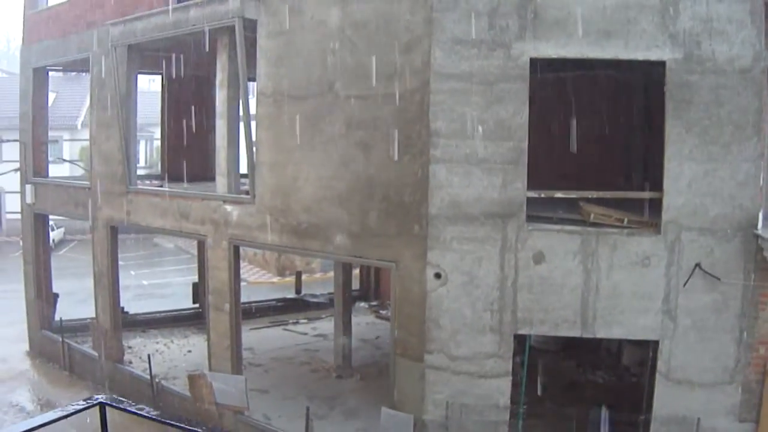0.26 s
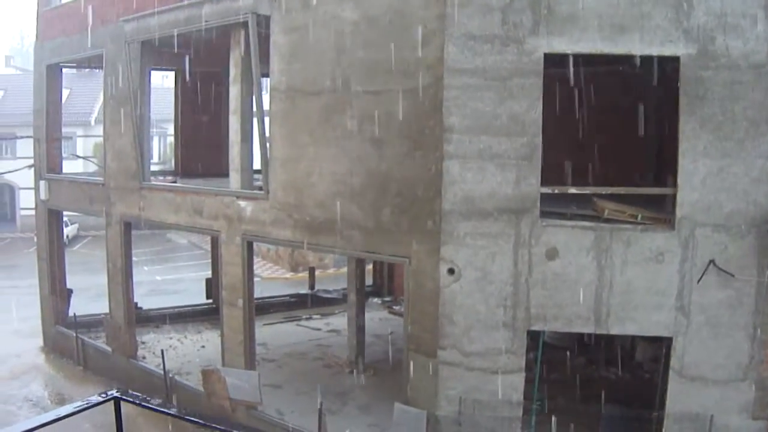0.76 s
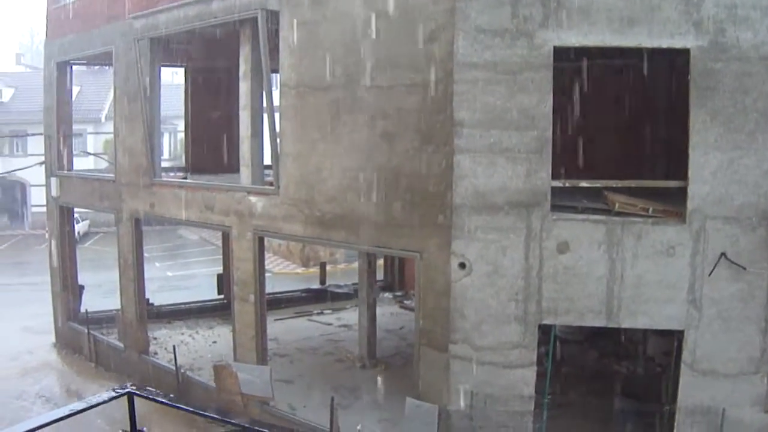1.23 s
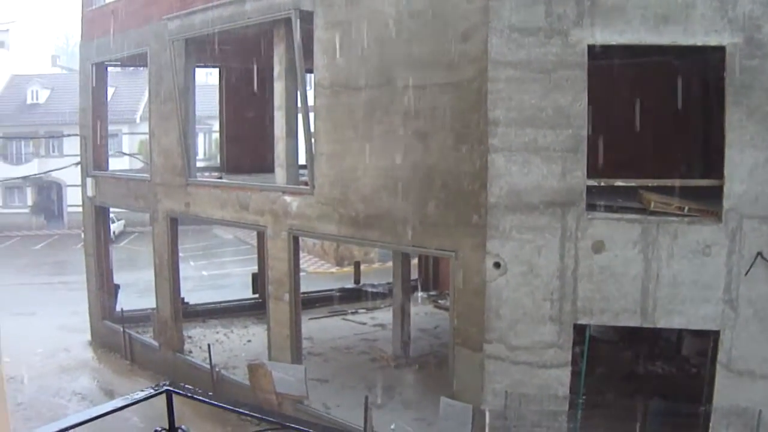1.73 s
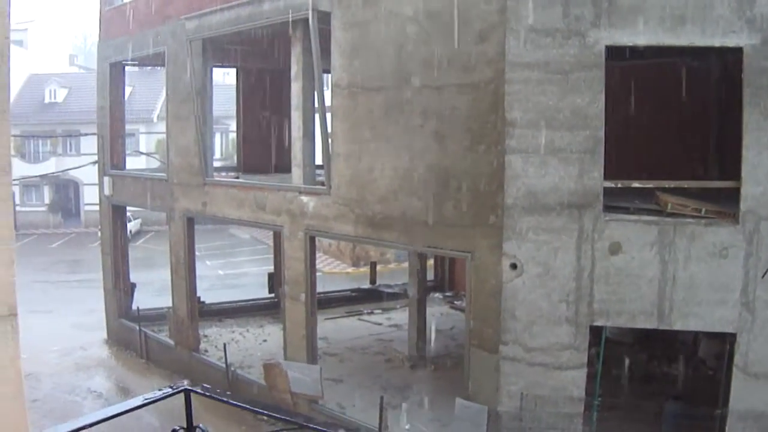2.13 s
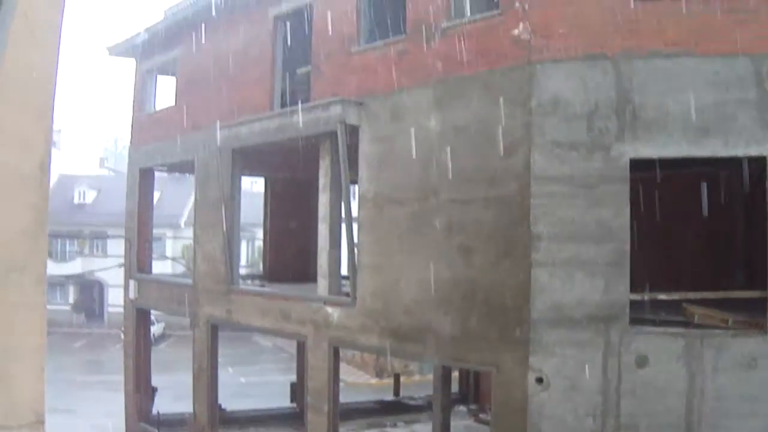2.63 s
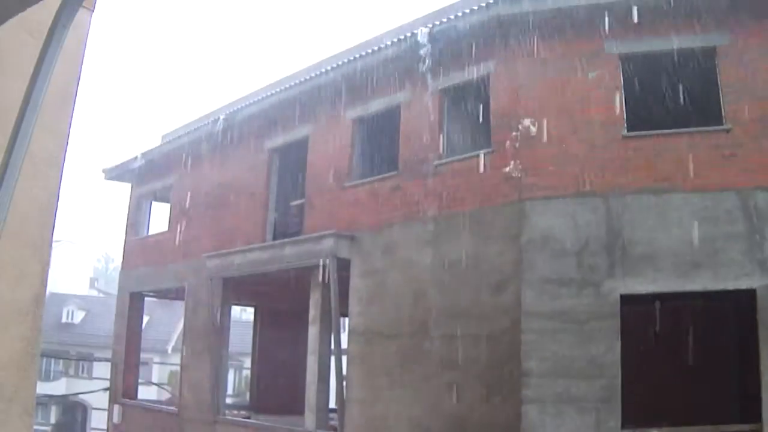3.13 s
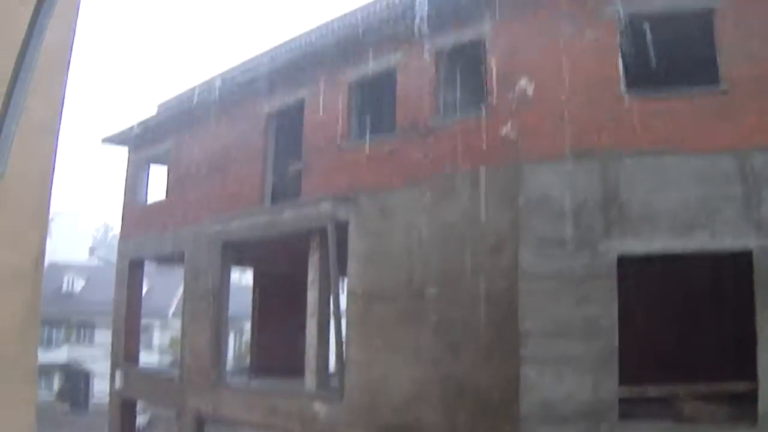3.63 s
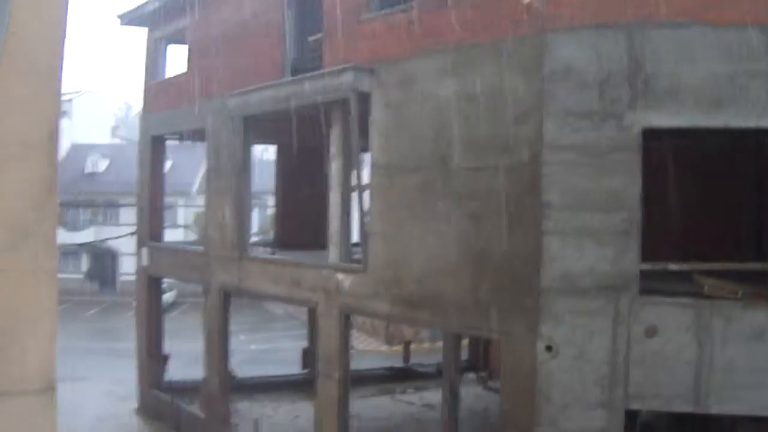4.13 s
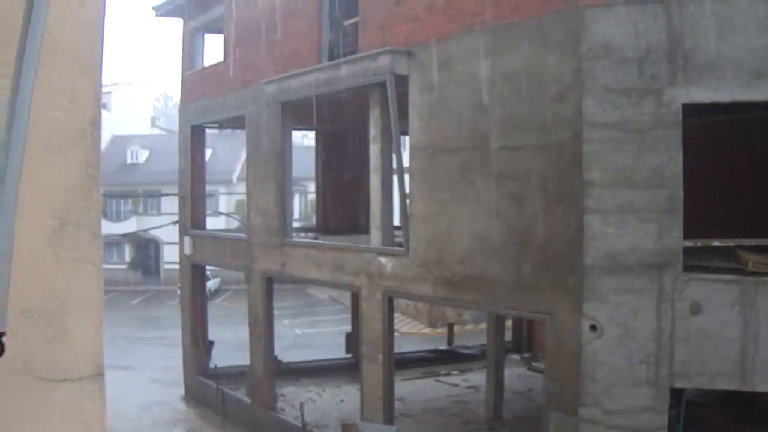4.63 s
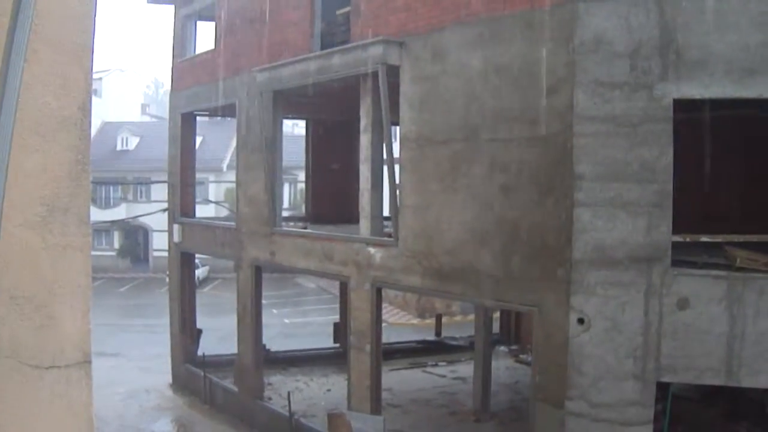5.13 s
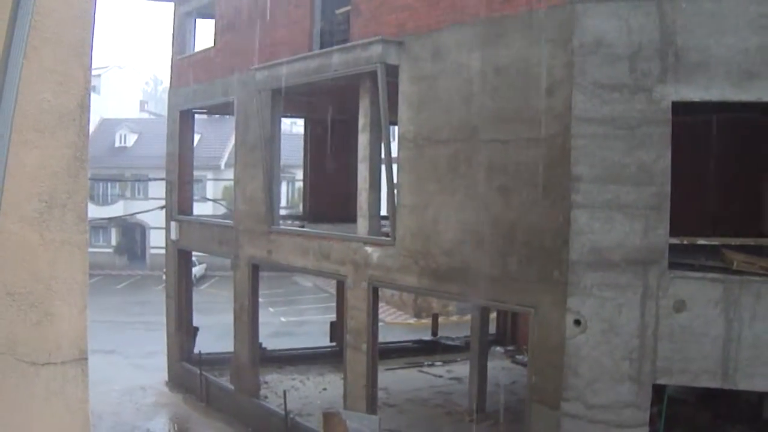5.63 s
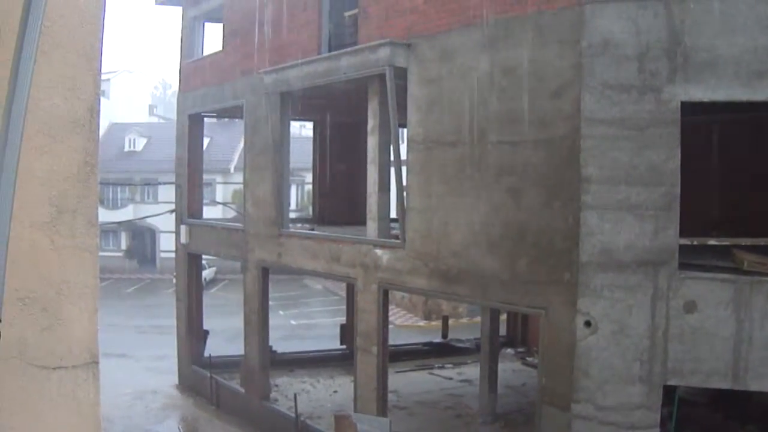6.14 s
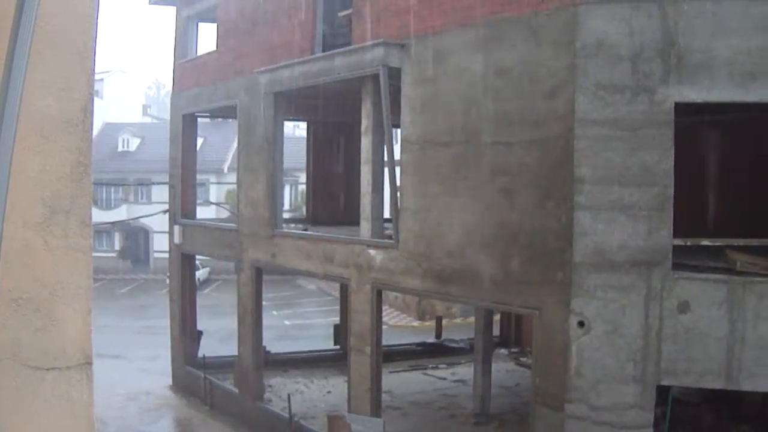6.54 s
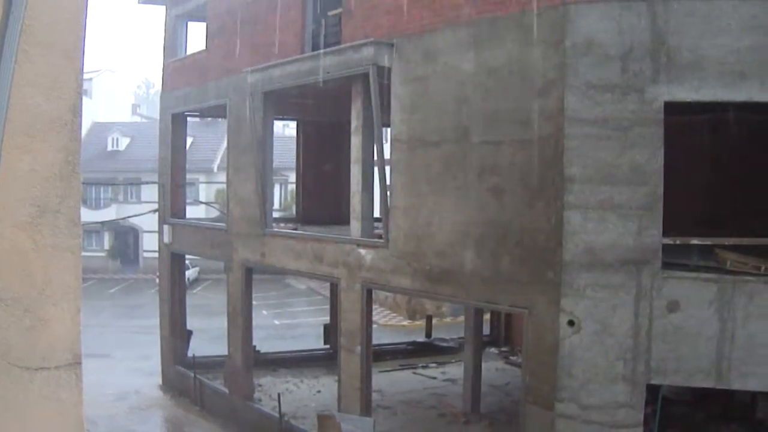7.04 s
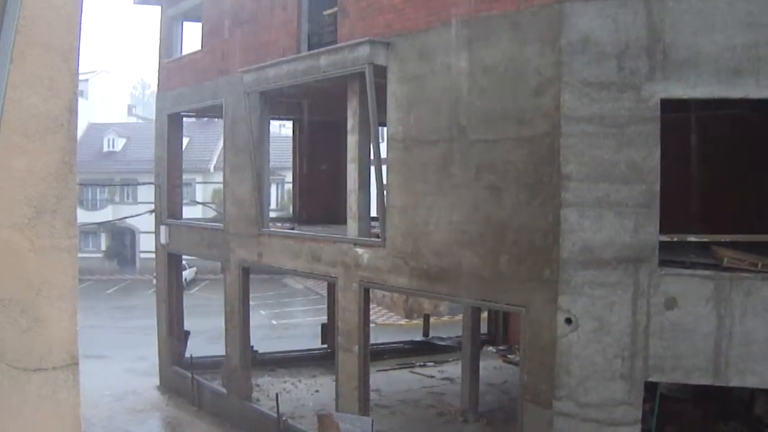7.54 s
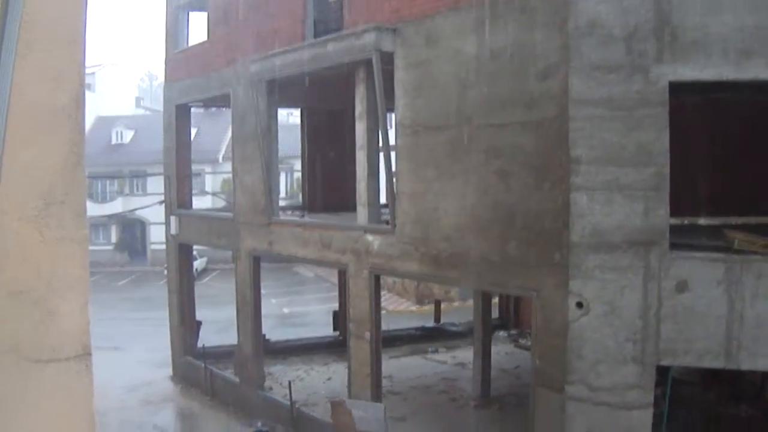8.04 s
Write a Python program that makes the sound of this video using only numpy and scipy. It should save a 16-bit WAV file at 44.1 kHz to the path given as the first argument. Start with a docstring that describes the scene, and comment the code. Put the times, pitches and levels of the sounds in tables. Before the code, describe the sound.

A steady downpour hisses and patters on wet pavement, while close drops crack on a sill and a hand briefly rubs the microphone.

```python
"""Paved lot and concrete building shell in heavy rain, heard from an open window.
Far drops merge into a wash; nearer ones patter, splash and trap ringing bubbles in puddles.
Run-off gushes into the puddles. A few drops burst on the sill; the loudest duck the limiter.
The hand-held microphone tilts once, shading the near rain, with a rub, soft bumps and rumble."""
import sys
import numpy as np
from scipy import signal
from scipy.fft import rfft, irfft
from scipy.io import wavfile
from scipy.ndimage import uniform_filter1d

SR = 44100
rng = np.random.default_rng(int(sys.argv[2]) if len(sys.argv) > 2 else 0)


def materialize(psi):
    """Save the field psi as 16-bit PCM at rate SR to the path in sys.argv[1].

    A 1-D psi becomes a single channel; in a 2-D psi each row is a channel.
    """
    bounded = np.clip(np.atleast_2d(psi).T, -1, 1)
    quanta = np.round(bounded * 32767).astype(np.int16)
    wavfile.write(sys.argv[1], SR, quanta)


N = 365148
TIME_S = np.arange(N) / SR
BIN_HZ = np.maximum(np.arange(N // 2 + 1) * SR / N, 1)

# downpour strength: t/s, level/dB
RAIN_LEVEL = [(0, -24), (.3, -25), (.55, -23.5), (1.7, -24), (2.0, -23.5), (2.8, -24), (3.7, -23),
              (5.6, -23), (6.4, -23.5), (8.28, -23.5)]
# far rain: f/Hz, relative level/dB
WASH_SPECTRUM = [(25, -73), (60, -39), (120, -20), (210, -9.5), (320, -6.5), (430, -8.2), (620, -3.5),
                 (800, -1), (1150, -1.5), (2000, -6), (4200, -9), (6500, -13), (7800, -14.5),
                 (11000, -16.5)]
# hollow ring of yard and open concrete rooms: f/Hz, width/Hz, gain/dB
YARD_RESONANCES = [(218, 22, 3), (322, 50, -4), (380, 23, 0.5), (428, 20, -2), (478, 46, 2.6),
                   (524, 35, -3), (594, 45, 2.5), (667, 24, -4), (736, 62, 3), (893, 29, 5), (918, 78, -3),
                   (1173, 56, 2), (1360, 43, -1), (1710, 400, 2), (2000, 120, 0), (2300, 140, 1.5),
                   (4600, 300, 1), (6580, 360, 2.5)]
# near rain: f/Hz, relative level/dB
PATTER_SPECTRUM = [(200, -29), (700, -6), (1500, -2), (3200, 1), (6000, -3), (8000, -7.5), (11000, -7)]
# air on the microphone: t/s, level/dB
AIR_LEVEL = [(0, -66), (.8, -59), (4.6, -63), (5.2, -66), (8.28, -68)]
# grip shifts on the case: centre t/s, level/dB, half-length/s
GRIP_SWELLS = [(.65, -55, .12), (0.89, -46, 0.077), (2.1, -41, 0.052), (2.3, -45, 0.14), (2.7, -46, .08),
               (3.04, -49, .05), (3.2, -49, .05), (3.468, -51, .06), (3.82, -60, .09), (4.73, -53, .04)]
# air and grip rumble: f/Hz, relative level/dB
RUMBLE_SPECTRUM = [(20, -27), (50, -6), (85, 0), (140, 4), (300, -27)]
# bursts on the sill: t/s, crack level/dB, spray level/dB, f/Hz, spray width/f, spray decay/s
SILL_DROPS = [(.467, -15, -23, 4500, .9, .024), (.526, -12, -24, 8900, .54, .018),
              (.773, -9, -16, 6000, .35, .004), (1.372, -18, -12, 1600, .55, .004),
              (1.381, -16, -18.5, 3100, .45, .014), (1.4262, -6, -25, 8000, .6, .0025),
              (1.453, -2.5, -18, 6300, .28, .007), (2.6325, -1.5, -12.3, 6000, .5, .007),
              (3.0548, -.5, -8.5, 3900, .45, .0024), (3.2812, 1, -16.3, 7400, .55, .0045),
              (3.656, -13, -23, 7800, .5, .005), (4.199, -18, -20, 5000, .5, .008),
              (4.224, -16, -20, 6800, .25, .005), (4.292, -12, -20.5, 5300, .8, .0055),
              (4.9635, -14, -18, 3400, .74, .007), (5.041, -12, -24, 8200, .5, .005),
              (5.449, -16, -21, 4500, .4, .005), (6.05, -9, -21.5, 8800, .55, .0069),
              (7.091, -6, -19, 7600, .6, .004), (7.179, -14, -17.5, 5400, 1.1, .012),
              (7.5719, -5, -14, 5500, .13, .003), (8.075, -18, -20, 2000, .5, .011),
              (8.088, -10, -25, 10300, .15, .005), (8.1175, -8, -14, 4900, 0.49, .004),
              (8.1695, -0.5, -12.5, 5000, .6, .0026)]
# run-off into puddles: centre t/s, level/dB, half-length/s, f/Hz, width/Hz
RUNOFF_GUSHES = [(.475, -28, 0.024, 997, 400), (1.174, -30, 0.065, 1102, 600),
                 (3.03, -28.5, 0.039, 1226, 200), (4.135, -27, 0.027, 843, 300),
                 (4.297, -28, 0.027, 980, 330), (6.666, -28, 0.056, 818, 298),
                 (6.965, -25.5, 0.028, 958, 350), (7.038, -29, 0.045, 1604, 250)]
# close drips trapping a bubble: t/s, level/dB, f/Hz, decay/s
DRIP_PLINKS = [(.6474, -16, 2500, .004), (4.1245, -12, 2600, .0042), (4.126, -20, 4440, .004),
               (4.242, -16, 3870, .005), (6.1754, -20, 6450, .007)]
# rub, loose to gripping to released: centre t/s, level/dB, half-length/s, width/Hz
RUB_SWELLS = [(1.85, -30, .25, 300), (2.26, -29.5, 0.12, 300), (2.315, -24, 0.033, 170),
              (2.405, -24, 0.091, 160), (2.535, -31.5, 0.054, 240)]
# hand on the case: t/s, level/dB, f/Hz
CASE_BUMPS = [(2.08, -20, 120), (2.131, -21, 260), (2.151, -22, 175), (2.164, -22, 180),
              (2.226, -23.5, 200), (2.530, -23, 230), (2.587, -20, 170), (2.594, -24, 149),
              (2.666, -22, 250), (2.729, -15, 275), (2.735, -19, 244), (2.754, -17, 230), (3.155, -27, 150)]
# skin on the case: f/Hz, relative level/dB
RUSTLE_SPECTRUM = [(30, -29), (90, -8), (200, -4), (350, -14), (800, -16), (3000, -50)]


def from_db(db):
    """Decibels to gain."""
    return 10 ** (np.asarray(db) / 20)


def unit_rms(x):
    """Scale to rms 1."""
    return x / np.sqrt(np.mean(x ** 2) + 1e-20)


def curve(rows):
    """Breakpoints to one value per sample."""
    return np.interp(TIME_S, *np.transpose(rows))


def swell(centre_s, half_s):
    """Gaussian envelope: peak 1, 1/e at half_s either side."""
    return np.exp(-np.minimum(((TIME_S - centre_s) / half_s) ** 2, 50))


def coloured(x, spectrum, resonances=()):
    """Apply a smooth spectrum plus peaks and dips; rms 1."""
    hz, db = np.transpose(spectrum)
    shape_db = np.interp(np.log(BIN_HZ), np.log(hz), db)
    for centre_hz, width_hz, gain_db in resonances:
        shape_db += gain_db / (1 + (2 * (BIN_HZ - centre_hz) / width_hz) ** 2)
    return unit_rms(irfft(rfft(x) * from_db(shape_db), N))


def drift(corner_hz):
    """Low-passed noise; rms 1."""
    return unit_rms(irfft(rfft(rng.standard_normal(N)) / (1 + (BIN_HZ / corner_hz) ** 2), N))


def noise_band(hz, width_hz):
    """Noise around a steady or moving pitch; rms 1."""
    phase = 2 * np.pi * np.cumsum(hz * np.ones(N)) / SR
    return unit_rms(drift(width_hz) * np.cos(phase) + drift(width_hz) * np.sin(phase))


def resonate(x, hz, width_hz):
    """Two-pole resonator, peak gain 1."""
    radius = np.exp(-np.pi * width_hz / SR)
    feedforward = np.array([1, 0, -1]) * (1 - radius ** 2) / 2
    feedback = [1, -2 * radius * np.cos(2 * np.pi * hz / SR), radius ** 2]
    return signal.lfilter(feedforward, feedback, x + 1e-18)


def low_cut(x, hz, order=3):
    """Maximally flat high-pass."""
    return signal.sosfilt(signal.butter(order, hz, "high", fs=SR, output="sos"), x)


def impacts(per_s, spread_db):
    """Random drop impulses: many small, few large."""
    sizes = from_db(spread_db * np.minimum(rng.exponential(1, N), 4))
    return sizes * (rng.random(N) < per_s / SR)


def wash(flutter_db):
    """Countless far drops merge into a roar, coloured by the yard."""
    roar = coloured(rng.standard_normal(N), WASH_SPECTRUM, YARD_RESONANCES)
    return roar * from_db(flutter_db * drift(corner_hz=6.6))


def plops(per_s, spread_db, decay_cycles, chirp, size=2048):
    """Drops trap bubbles in puddles; each rings a few cycles, pitch rising slightly."""
    out, age_s = np.zeros(N + size), np.arange(size) / SR
    sizes = impacts(per_s, spread_db)
    pitches_hz = 650 * 2 ** (2.3 * rng.random(N) ** 1.498)
    for at in np.flatnonzero(sizes):
        cycles = pitches_hz[at] * age_s
        ring = np.sin(2 * np.pi * cycles * (1 + chirp * cycles / decay_cycles))
        out[at:at + size] += sizes[at] * ring * np.exp(-cycles / decay_cycles)
    return unit_rms(low_cut(out[:N], hz=556))  # small bubbles radiate no bass


def patter(per_s, spread_db, width_ratio, bands=12):
    """Near drops tick for a cycle or two, pitched by their size and the puddle hit."""
    ticks = impacts(per_s, spread_db) * rng.choice([-1, 1], N)
    tick_band = rng.integers(0, bands, N)
    out = np.zeros(N)
    for band, hz in enumerate(np.geomspace(900, 10500, bands)):
        out += resonate(ticks * (tick_band == band), hz, width_ratio * hz)
    return coloured(out, PATTER_SPECTRUM)


def splashes(per_s, spread_db, decay_s, droplets_per_s, bands=6):
    """Fat drops throw short showers of droplets, each with its own brightness."""
    out = np.zeros(N)
    pole = np.exp(-2 / (decay_s * SR))
    for hz in np.geomspace(2400, 9800, bands):
        hits = impacts(per_s / bands, spread_db)
        energy = signal.lfilter([1], [1, -pole], hits ** 2 + 1e-18)
        droplets = rng.standard_normal(N) * (rng.random(N) < droplets_per_s / SR)
        out += resonate(np.sqrt(energy) * droplets, hz, width_hz=0.29 * hz)
    return coloured(out, PATTER_SPECTRUM)


def rumble():
    """Air brushes the microphone; grip shifts swell over it."""
    air_power = from_db(curve(AIR_LEVEL)) ** 2
    grip_power = sum((from_db(db) * swell(t_s, half_s)) ** 2 for t_s, db, half_s in GRIP_SWELLS)
    return np.sqrt(air_power + grip_power) * coloured(rng.standard_normal(N), RUMBLE_SPECTRUM)


def sill_drops(crack_decay_s=0.000138, spray_delay_s=0.0021, spray_attack_s=0.0005, size=4096):
    """A drop cracks on the sill, then breaks into spray around the same pitch."""
    out, age_s = np.zeros(N + size), np.arange(size) / SR
    spray_age_s = np.maximum(age_s - spray_delay_s, 0)
    for t_s, crack_db, spray_db, hz, width_ratio, decay_s in SILL_DROPS:
        at = int(t_s * SR)
        crack = np.sin(2 * np.pi * hz * age_s) * np.exp(-age_s / crack_decay_s)
        spray = unit_rms(resonate(rng.standard_normal(size), hz, width_ratio * hz))
        envelope = np.exp(-spray_age_s / decay_s) * (1 - np.exp(-spray_age_s / spray_attack_s))
        out[at:at + size] += from_db(crack_db) * crack + from_db(spray_db) * spray * envelope
    return low_cut(out[:N], hz=420, order=2)


def gushes():
    """Run-off hits a puddle: a crowd of like-sized bubbles swells and dies."""
    bubbles = sum(from_db(db) * swell(t_s, half_s) * noise_band(hz, width_hz)
                  for t_s, db, half_s, hz, width_hz in RUNOFF_GUSHES)
    return low_cut(bubbles, hz=490)


def plinks(attack_s=0.0012, rise_per_s=1.5, size=4096):
    """A close drip traps one bubble; its clear pitch climbs slightly as it surfaces."""
    out, age_s = np.zeros(N + size), np.arange(size) / SR
    for t_s, db, hz, decay_s in DRIP_PLINKS:
        at = int(t_s * SR)
        ring = np.sin(2 * np.pi * hz * age_s * (1 + rise_per_s * age_s / 2))
        envelope = np.exp(-age_s / decay_s) * (1 - np.exp(-age_s / attack_s))
        out[at:at + size] += from_db(db) * ring * envelope
    return out[:N]


def rub(top_hz=1835, sag_hz=129.2, slip_hz=110, rough_db=2):
    """Stick-slip feeds one resonance: broad when loose, a rasping half-whistle when gripping."""
    pitch_hz = top_hz - sag_hz * (1 - swell(centre_s=2.39, half_s=0.2))
    slips = unit_rms(from_db(rough_db * drift(slip_hz)))
    resonance = sum(from_db(db) * swell(t_s, half_s) * noise_band(pitch_hz, width_hz)
                    for t_s, db, half_s, width_hz in RUB_SWELLS)
    return slips * resonance


def bumps(attack_cycles, size=4096):
    """A fingertip pushes the case, which swings about twice and passes little deep bass."""
    out, age_s = np.zeros(N + size), np.arange(size) / SR
    for t_s, db, hz in CASE_BUMPS:
        at = int(t_s * SR)
        push = (age_s * hz / attack_cycles) ** 2
        envelope = push * np.exp(1 - push)
        out[at:at + size] += from_db(db) * envelope * np.sin(2 * np.pi * hz * age_s)
    return low_cut(out[:N], hz=116)


def rustle(knocks, smear_s):
    """Skin drags on the case around each bump."""
    envelope = np.sqrt(np.abs(uniform_filter1d(knocks ** 2, int(smear_s * SR))))
    return envelope * coloured(rng.standard_normal(N), RUSTLE_SPECTRUM)


def scene():
    """Rain layers following the downpour, close water and hand noise; mono."""
    rain_db = curve(RAIN_LEVEL)
    tilt_shade_db = 2.5 * swell(centre_s=3.15, half_s=0.83)  # up, away from the wet ground, and back
    near_db = rain_db - tilt_shade_db
    far = from_db(rain_db + 0.5) * wash(flutter_db=0.25)
    puddles = from_db(rain_db - 11) * plops(per_s=260, spread_db=1.5, decay_cycles=8.4, chirp=0.0065)
    near = from_db(near_db - 6) * patter(per_s=3600, spread_db=0.5, width_ratio=0.98)
    spray = from_db(near_db - 7.5) * splashes(per_s=130, spread_db=2, decay_s=0.028, droplets_per_s=5000)
    knocks = bumps(attack_cycles=0.75)
    hand = knocks + from_db(-4.5) * rustle(knocks, smear_s=0.033) + rub() + rumble()
    return (far + puddles + near + spray + gushes() + plinks() + sill_drops() + hand)[None]


def limiter(x, ceiling_db, attack_s, release_s):
    """A peak over the ceiling slips through and ducks the gain, which creeps back."""
    excess_db = np.maximum(20 * np.log10(np.abs(x) + 1e-9) - ceiling_db, 1e-9)
    release = TIME_S / release_s
    held_db = np.exp(np.maximum.accumulate(np.log(excess_db) + release, axis=-1) - release)
    pole = np.exp(-1 / (attack_s * SR))
    duck_db = signal.lfilter([1 - pole], [1, -pole], held_db)
    return x * from_db(-duck_db)


def record(dry):
    """Full-band limiter, then steep low-pass."""
    limited = limiter(dry, ceiling_db=-9.5, attack_s=0.003, release_s=0.042)
    cutoff_hz = 11000
    return signal.sosfilt(signal.ellip(18, 0.1, 90, cutoff_hz, fs=SR, output="sos"), limited)


dry = scene()
out = record(dry)
materialize(out)
```